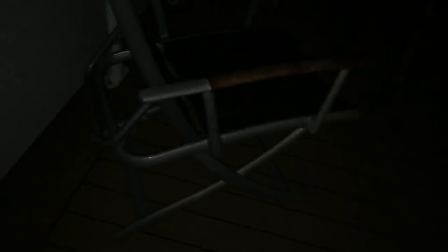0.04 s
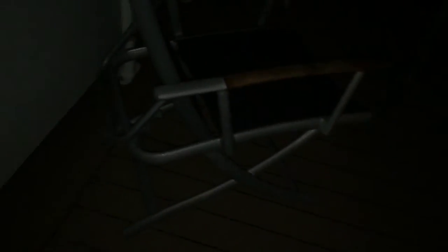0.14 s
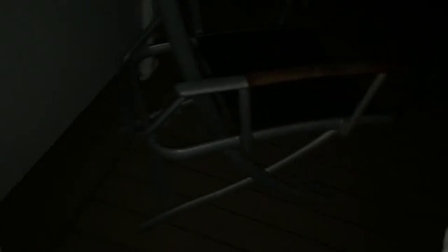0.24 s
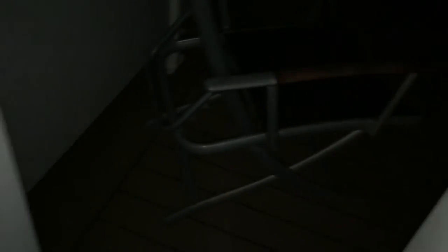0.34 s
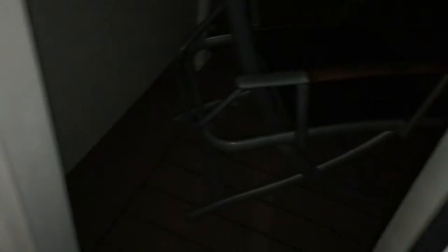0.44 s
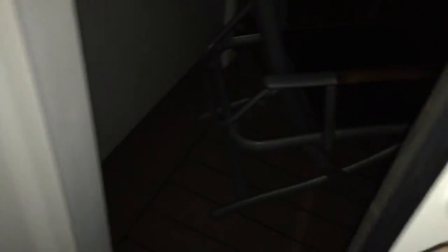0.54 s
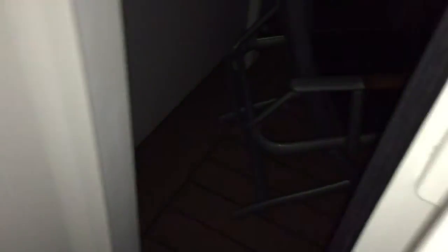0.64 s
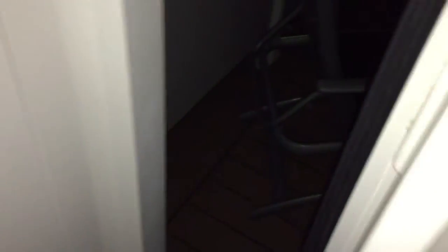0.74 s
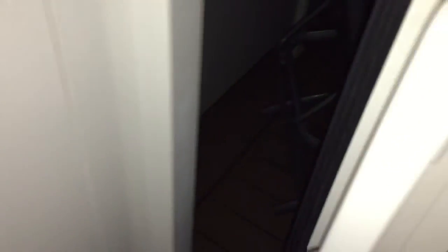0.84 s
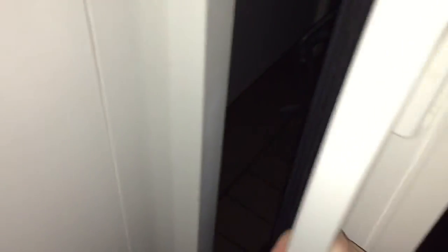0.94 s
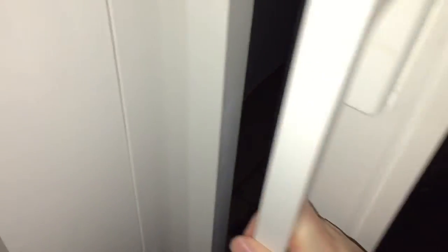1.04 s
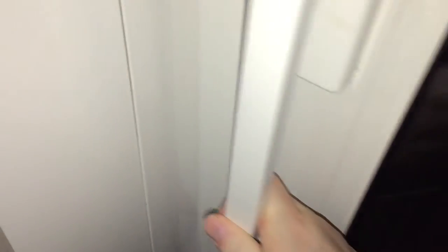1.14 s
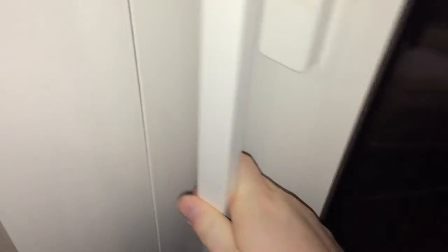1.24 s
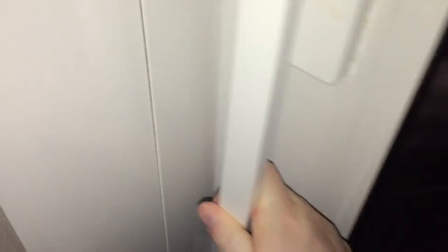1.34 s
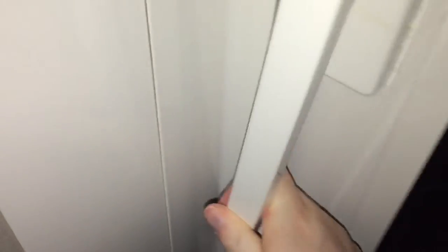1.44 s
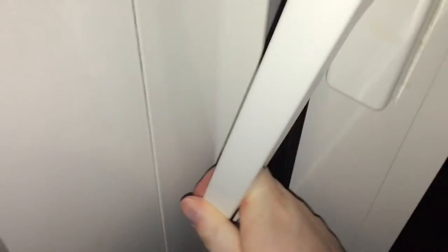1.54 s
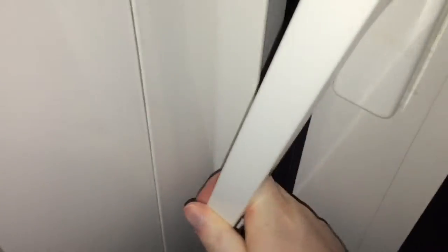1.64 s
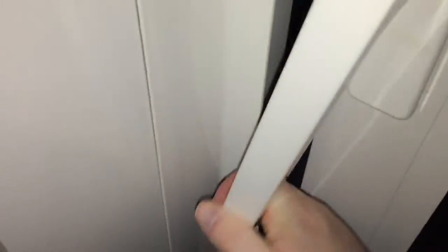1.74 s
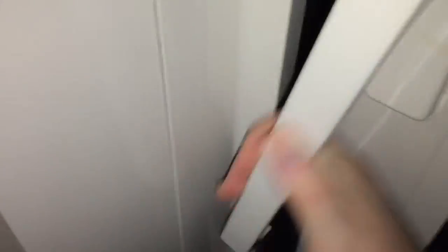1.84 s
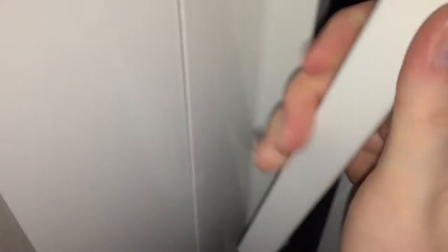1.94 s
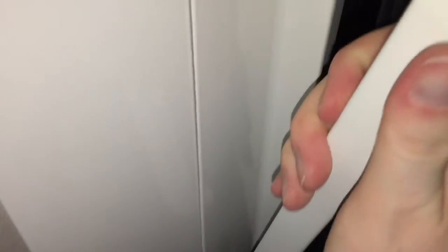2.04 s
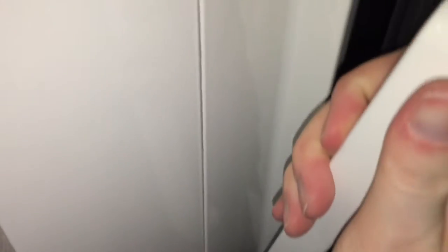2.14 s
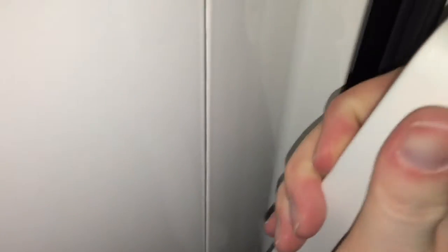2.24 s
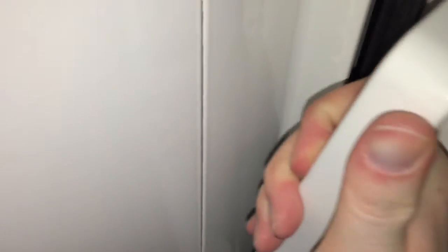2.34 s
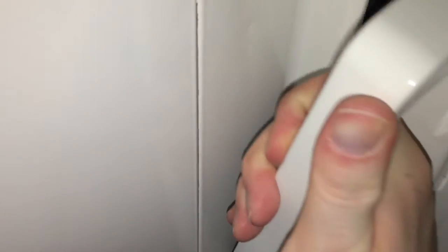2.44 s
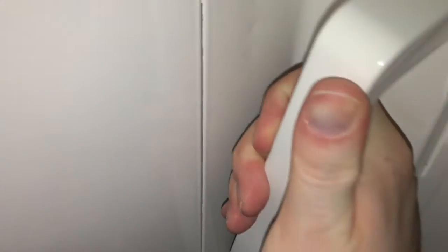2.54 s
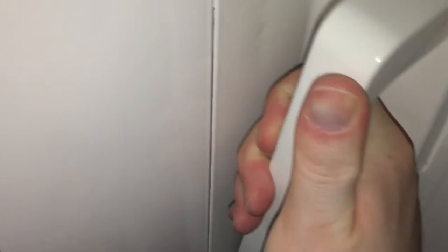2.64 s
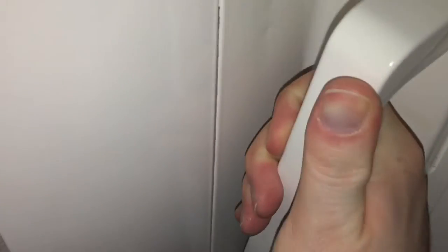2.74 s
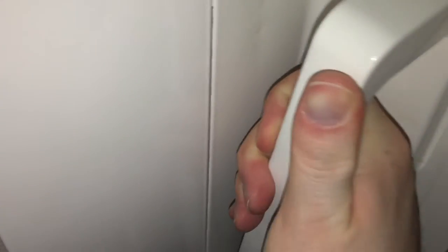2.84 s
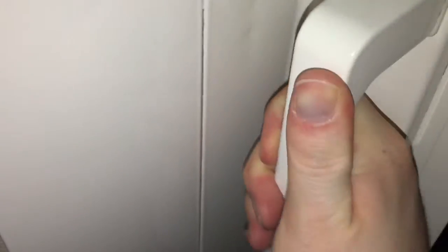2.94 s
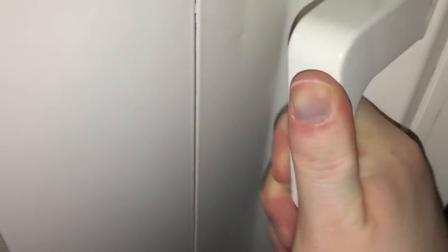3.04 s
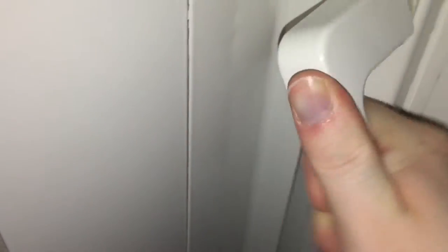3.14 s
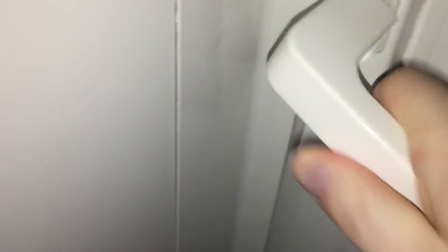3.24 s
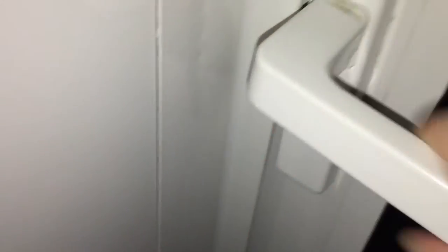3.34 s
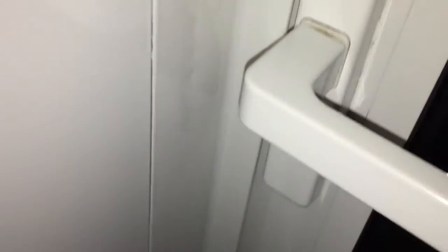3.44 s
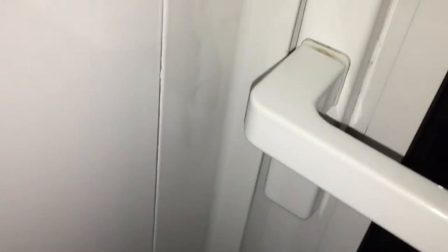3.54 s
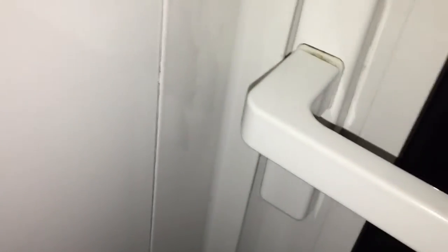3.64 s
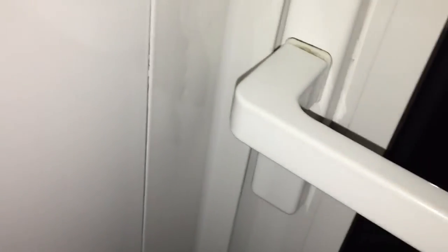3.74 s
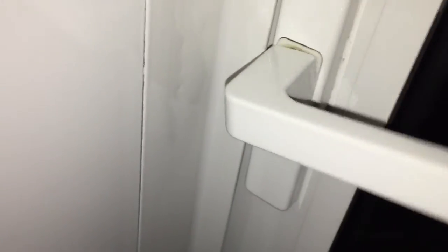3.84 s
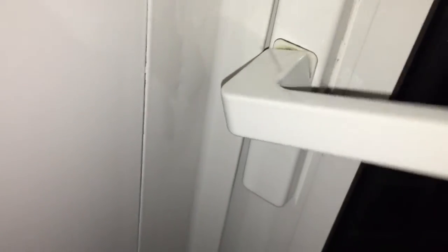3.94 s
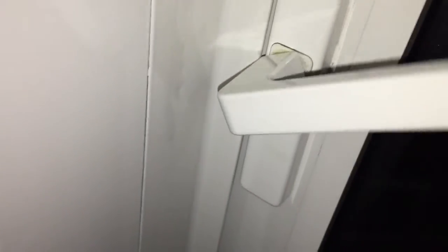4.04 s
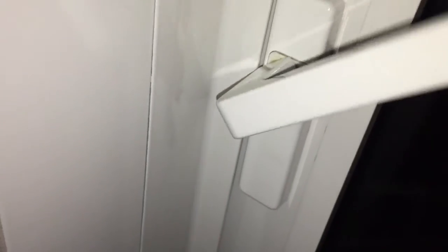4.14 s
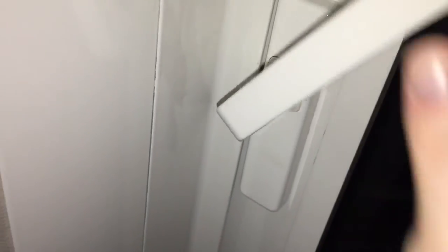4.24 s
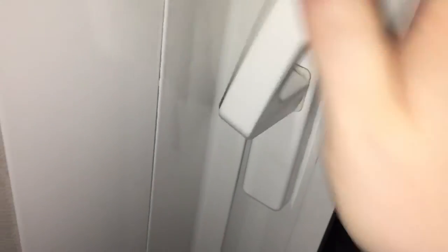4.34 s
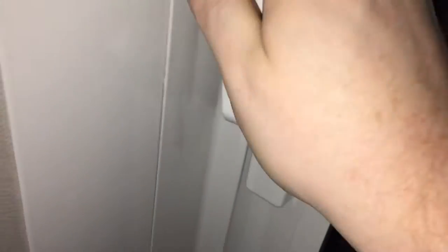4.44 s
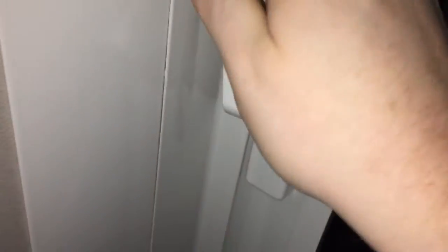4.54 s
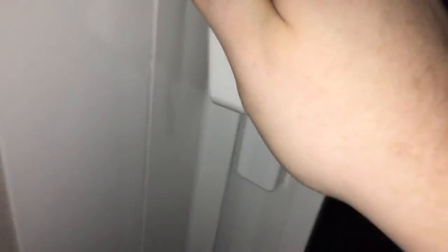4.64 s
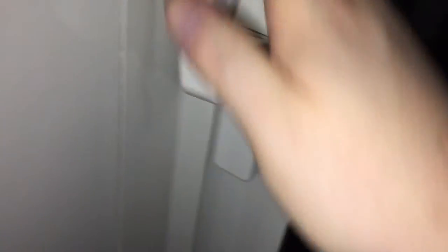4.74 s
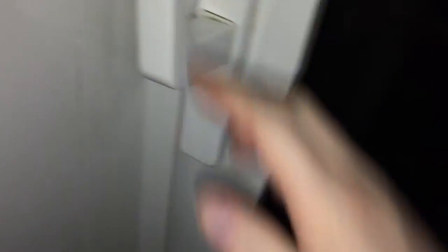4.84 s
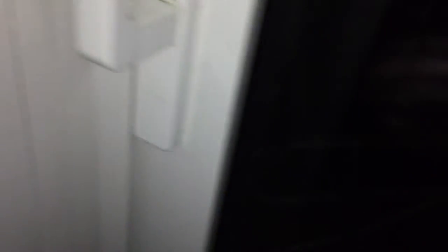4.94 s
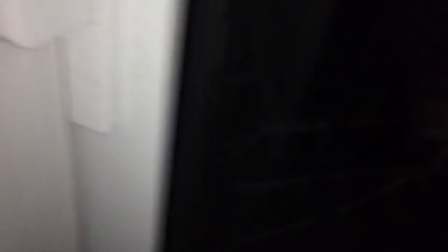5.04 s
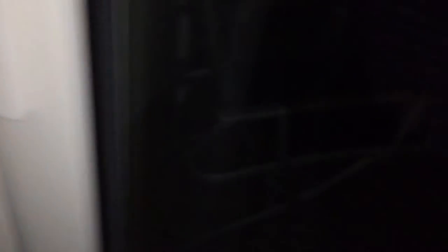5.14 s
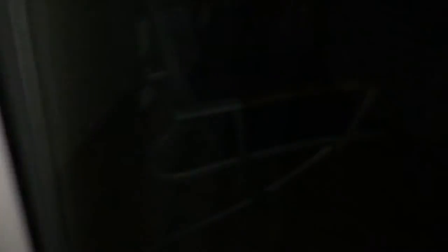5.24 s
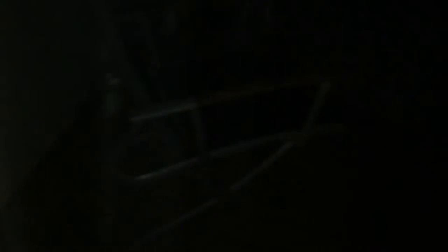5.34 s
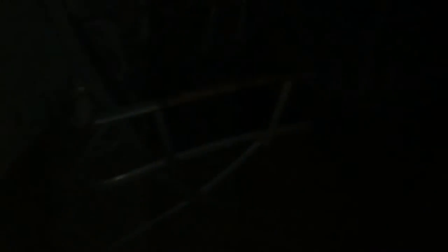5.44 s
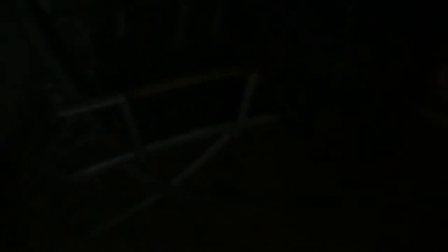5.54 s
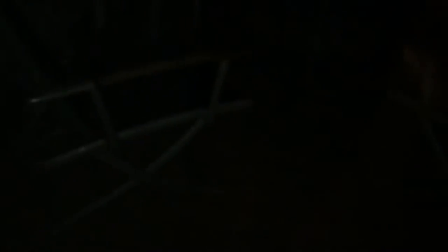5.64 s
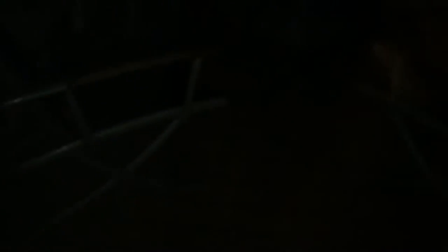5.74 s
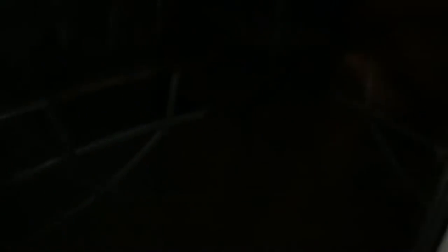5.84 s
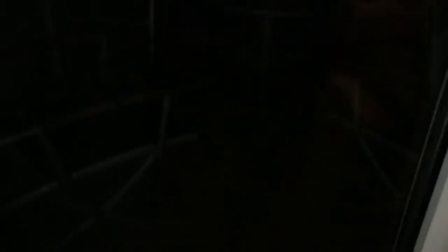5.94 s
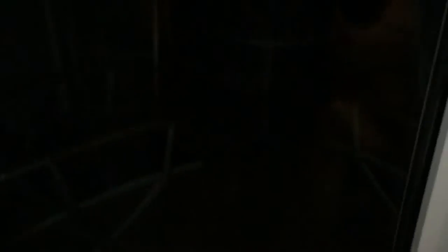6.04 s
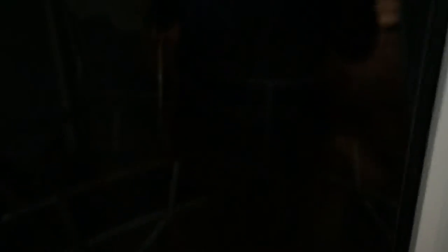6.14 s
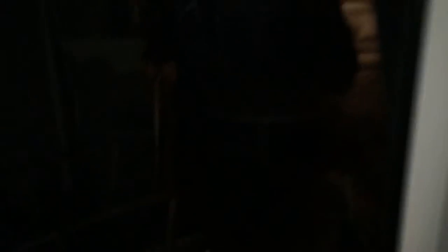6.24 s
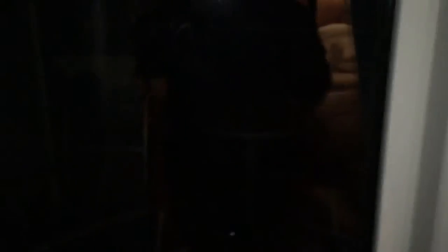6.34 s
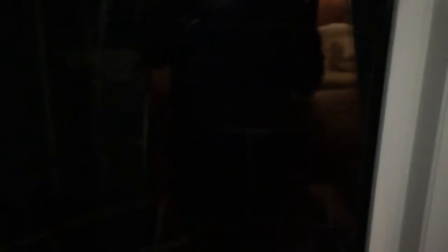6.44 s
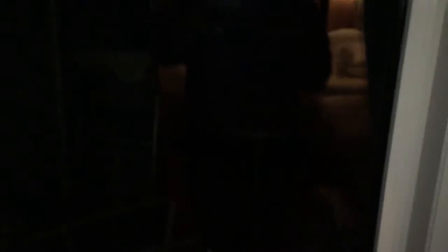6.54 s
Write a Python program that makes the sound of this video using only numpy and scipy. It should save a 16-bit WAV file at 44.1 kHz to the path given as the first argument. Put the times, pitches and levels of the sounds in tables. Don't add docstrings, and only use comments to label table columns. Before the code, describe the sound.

Close up in a small quiet cabin, a heavy door rolls along its rail with low rumble and drone, then bumps hard with a metallic rattle and buzzing frame. It creeps on, clicks and thumps dully into the frame. Fingers tick on a plastic handle, light catches click, and the bolt snaps home with a squeak, so loud it overloads the microphone. Faint taps follow.

```python
import sys
import numpy as np
from scipy import signal
from scipy.io import wavfile

SR = 44100
rng = np.random.default_rng(int(sys.argv[2]) if len(sys.argv) > 2 else 0)


def elevation(decibels):
    levels = np.asarray(decibels, float)
    return 10 ** (levels / 20)


def log_audio(samples):
    frames = np.atleast_2d(samples).T
    limited = np.clip(frames, -1, 1)
    pcm = np.round(limited * 32767).astype(np.int16)
    wavfile.write(sys.argv[1], SR, pcm)


N = 290178

# frequency in Hz, level in dB per Hz.
HUSH = [(18, -33), (30, -6), (60, 0), (120, -3), (171, -7), (253, -27), (500, -30), (765, -25), (1100, -22),
        (1730, -18), (2400, -25), (3300, -28), (5800, -31), (14600, -38)]
# frequency in Hz, time to fall 60 dB in seconds.
CABIN_ECHO = [(300, 0.29), (1500, 0.22), (5000, 0.17), (12000, 0.12)]

# time in seconds, swell in seconds, frequency in Hz, width in Hz, level in dB.
SLIDES = [
    (1.93, .07, 13000, 3500, -66),
    (2.35, .05, 5200, 700, -65),
    (2.3, .2, 2000, 800, -60),
    (5.91, .03, 12000, 7000, -65),
    (4.457, .006, 1900, 900, -42),
]
# time in seconds,
# swell in seconds, frequency in Hz, width in Hz, level in dB.
NUDGES = [(4.86, .13, 252, 14, -45), (.65, .11, 1003, 30, -47), (0.29, 0.08, 150, 13, -39),
          (1.29, 0.02, 1800, 600, -46), (1.309, .007, 2000, 2000, -42), (4.058, .02, 750, 650, -49),
          (3.94, .03, 1450, 500, -53), (2.21, 0.18, 235, 52, -50.5), (0.694, 0.036, 268, 18, -32),
          (.42, .13, 1520, 35, -51), (5.8, 0.0087, 1300, 300, -61), (4.84, 0.023, 1440, 390, -55),
          (6.24, 0.025, 280, 130, -43)]

# time in seconds, frequency in
# Hz, level in dB, swell in seconds, 60 dB fall in seconds.
SQUEAKS = [
    (4.4625, 1640, -3, .003, .026),
    (4.474, 1750, -11, .007, .015),
    (2.508, 2300, -36, .008, .03),
           (1.568, 2330, -43, .008, .04),
    (2.912, 1650, -44, .006, .04),
    (3.217, 1250, -35, .003, .025),
]
# time in
# seconds, frequency in Hz, level in dB, swell in seconds, 60 dB fall in seconds.
RINGS = [(1.323, 257, -3, 0.0031, 0.046), (1.327, 1208, -9, 0.0017, 0.054),
         (1.328, 2130, -7.5, 0.0047, 0.031), (1.346, 227, -4, 0.0057, 0.051),
         (1.357, 882, -12, 0.0052, 0.065), (1.384, 225, -13, 0.0064, 0.084),
         (1.385, 102, -13, 0.015, 0.28), (1.399, 1124, -12.5, 0.0029, 0.033),
         (2.5205, 1610, -6.5, 0.00082, 0.009), (2.528, 231, -13.5, 0.0083, 0.11),
         (2.59, 243.6, -30.5, 0.026, .12), (2.657, 1250, -18.5, 0.0029, 0.12),
         (2.659, 1800, -24.5, 0.0033, 0.074), (2.674, 420, -10.5, 0.002, 0.021),
         (2.69, 1138, -16.5, 0.0033, 0.06), (2.776, 1073, -19, 0.0022, 0.029),
         (2.777, 1996, -29.5, 0.0017, 0.052), (2.84, 103.9, -14, 0.016, 0.36),
         (3.022, 883, -34.5, 0.0034, 0.14), (3.024, 1386, -29, 0.0045, .05),
         (3.024, 2000, -37.5, 0.0028, .05), (3.03, 244, -17.5, 0.0096, 0.062),
         (3.843, 1370, -19, 0.00092, 0.016), (3.848, 1500, -20.5, 0.0024, 0.025),
         (3.884, 129, -28, 0.0065, .15), (4.07, 305, -34.5, 0.0083, 0.076),
         (4.4823, 905, -5.5, 0.0011, 0.031), (4.484, 616, -11, .001, 0.076),
         (4.485, 1672, -6.5, .004, 0.068), (4.483, 2960, -12.5, 0.0014, 0.058),
         (4.488, 2200, -12, .003, 0.079), (4.499, 236, -7.5, 0.0094, 0.13),
         (4.501, 338, -11.5, 0.0039, 0.12), (4.504, 167, -10.5, 0.0038, 0.13),
         (4.55, 246, -21.5, 0.017, 0.17),
         (6.166, 1850, -43, 0.0036, 0.057), (6.166, 4500, -46, .003, .06),
               (6.168, 5800, -49, .002, .03), (6.166, 2080, -47.5, .004, 0.043),
               (6.214, 320, -43, .008, .08), (6.224, 60, -37, 0.0048, .12), (6.228, 221, -41, .006, 0.075),
               (6.248, 303, -40.5, .006, 0.069), (6.254, 156, -39, 0.0048, 0.092),
               (6.273, 110, -39, .005, .09), (6.385, 450, -51, 0.0062, 0.039),
               (3.844, 2654, -29, 0.0012, 0.036), (3.846, 3235, -31, 0.0017, 0.038),
               (3.847, 1800, -28, 0.0025, 0.072), (3.846, 1230, -31.5, 0.0035, 0.083),
               (3.886, 240, -33, .005, 0.045), (3.94, 270, -38, 0.0087, 0.097),
               (3.385, 237, -35, 0.0099, 0.038), (1.775, 4500, -45.5, 0.0042, 0.033),
               (3.024, 4050, -33.5, .003, .03), (2.521, 490, -14.5, .001, .015),
               (3.82, 1600, -50, .004, .05), (2.712, 3800, -41, .003, .03), (2.959, 1100, -43.5, .002, .05),
               (4.465, 4030, -15, .002, 0.034), (4.512, 260, -10, 0.0034, 0.11),
               (4.503, 290, -9, .003, .06), (4.71, 250, -41, .015, .3), (4.879, 2300, -46, .003, .05),
               (4.05, 290, -36, .006, .07), (4.96, 150, -36, .01, .1), (5.0, 130, -34, .01, .1),
               (4.963, 1600, -42, .004, .05), (4.49, 1100, -10, .003, .05)]

# time in seconds, tap in dB, crack in dB, rattle's 60 dB fall in seconds, highest frequency in Hz.
TICKS = [(.869, -59.5, -50.5, 0.093, 16260), (1.772, -42.5, -50.5, 0.04, 6400),
         (2.798, -49, -54.5, 0.04, 5950), (3.136, -51, -60.5, 0.029, 14240),
         (3.219, -51, -64.5, 0.12, 16250), (4.878, -48.5, -54, 0.064, 5570), (4.886, -56, -60, 0.087, 4920),
         (4.933, -60, -58, 0.06, 14770), (4.957, -51, -53.5, 0.08, 11100), (4.965, -38.5, -50, 0.069, 6320),
         (4.979, -39, -46, 0.031, 17400), (4.984, -43, -51.5, 0.059, 9050), (5.037, -51, -54, 0.12, 7300),
         (5.048, -55, -56.5, 0.11, 5490), (5.997, -48.5, -58.5, 0.076, 9080),
         (6.013, -53.5, -62, 0.059, 12180), (6.168, -52.5, -54.5, 0.076, 17470)]
# time in seconds, body in dB, rattle's 60 dB fall in seconds.
THUDS = [(3.364, -46, 0.059), (3.818, -50, 0.091), (4.01, -48, .12), (4.033, -48, 0.052),
         (4.05, -41, 0.076), (4.717, -49, 0.049), (4.986, -49.5, 0.028), (6.216, -50.5, 0.031),
         (6.257, -65, 0.095)]
# time in seconds, knock peak in dB, body in dB,
# rattle's 60 dB fall in seconds, highest frequency in Hz.
CATCHES = [(2.521, -7.5, -18.5, 0.0068, 17670), (2.525, -10, -22.5, 0.014, 7270),
           (2.535, -23.5, -23.5, 0.026, 9050), (3.024, -32, -41.5, 0.043, 14560),
           (3.845, -27, -40.5, 0.044, 4800), (3.868, -43, -36.5, 0.068, 4400),
           (3.887, -55.5, -58, .042, 4508), (4.463, -19, -21, 0.12, 19120), (4.483, -5.5, -7, 0.05, 18290),
           (4.487, -9, -14, 0.024, 18750), (4.492, -6.5, -12.5, 0.026, 18100),
           (4.496, -9.5, -13.5, 0.069, 15980), (4.503, -20.5, -10, .04, 12030)]
# time in seconds, knock peak in dB, crack in dB, body in dB,
# rattle's 60 dB fall in seconds.
BLOWS = [(1.315, -19, -44, -21, .11), (1.323, -20, -34, -8, 0.015), (1.327, -9.5, -6, -16.5, 0.03),
         (1.335, -12, -22.5, -10.5, 0.023), (1.345, -18, -29.5, -24, 0.046),
         (1.355, -21.5, -44.5, -13, 0.025), (1.381, -29, -66, -13, 0.025), (1.401, -29, -49, -14.5, 0.032),
         (2.657, -27.5, -53, -25.5, 0.18), (2.675, -21.5, -51.5, -13, 0.09),
         (2.69, -20, -44.5, -19.5, 0.012), (2.715, -26, -54, -25, 0.023), (2.738, -47.5, -69, -11, 0.057),
         (2.777, -34, -67, -11, 0.016), (2.799, -39, -71, -11, 0.013), (2.818, -48, -71, -23.5, 0.023),
         (2.863, -52, -100.5, -26, 0.018), (2.889, -73, -73, -28, 0.057), (2.959, -42.5, -80, -30.5, 0.32)]

# frequency in Hz, width in Hz, level in dB.
GRIP = [(1075, 110, 6.5), (1610, 310, 9), (1970, 480, 8), (2200, 410, 3.5), (2860, 100, -33)]
# frequency in Hz, width in Hz, level in dB.
LOCK_CASE = [(60.4, 38, -7.5), (167, 34, -6), (230.6, 8.3, 3.5), (255, 5.1, 1.5), (325, 16, -2),
             (424, 11, -2), (481, 26, -6.5), (616, 120, -9), (867, 160, -11)]
# frequency in Hz, width in Hz, level in dB.
KNOCK = [(633, 65, -3), (896, 150, 4), (1130, 650, 1.5), (1500, 140, 6.5), (1750, 620, -1.5),
         (2220, 630, -5.5), (3130, 360, -40)]
# frequency in Hz, width in Hz, level in dB.
FRAME = [(851.3, 35, -0.5), (1000, 72, -7.5), (1125, 45, -1.5), (1250, 55, -0.5), (1336, 54, -3),
         (1552, 90, -6), (1800, 200, -17)]
# frequency in Hz, level in dB per Hz.
CRACK = [(1470, -26.5), (2500, -2.5), (2770, -1), (4690, -1), (8270, -8.5), (12200, -13), (14500, -9.5),
         (16000, -28)]

# frequency in Hz, width in Hz, level in dB.
SWAY = [(39.7, 13, -3.5), (57.4, 4.7, 11.5), (62, 24, 3)]
# frequency in Hz, width in Hz, level in dB.
PANEL = [(98.5, 26, 0), (135.7, 16, 8), (153.7, 42, 1), (245, 20, 0.5), (295.5, 44, -7.5)]
# frequency in Hz, width in Hz, level in dB.
RAIL = [(420, 120, -2), (560, 290, -6.5), (910, 84, -4), (1026, 40, 1), (1266, 330, -5)]
# frequency in Hz, width in Hz, level in dB.
RAIL_WHINE = [(1515, 52, 2.5), (1580, 360, -3), (1800, 140, -1), (2000, 170, -8.5), (2240, 210, -4.5),
              (2420, 250, -16)]
# frequency in Hz, level in dB per Hz.
GRIT = [(1470, -34.5), (2500, 0), (4840, -13.5), (6500, -16.5), (11500, -28.5), (15300, -25.5),
        (16000, -45)]
# time of the peak in seconds,
# sway in dB, panel rumble in dB, rub in dB, 60 dB fall in seconds.
LURCHES = [(1.0, -48, -30.5, -60.5, 0.74), (1.27, -46.5, -33, -64, 0.48), (1.429, -28.5, -26, -45, 0.78),
           (1.78, -44, -41, -60, 1.43), (2.4, -56.5, -47, -60.5, 1), (2.57, -55.5, -36, -48, 0.64),
           (2.741, -22, -15.5, -44, 0.5), (3.059, -43.5, -37.5, -76, 1.2), (3.62, -49, -62, -75, .6),
           (5.3, -51, -60, -75, 1.0), (5.72, -53, -66, -75, .6), (6.42, -53, -62, -75, .4),
           (3.881, -46, -39, -68.5, 0.68), (4.048, -55.5, -47.5, -65.5, 0.65),
           (4.619, -63, -40, -64.5, 0.99), (4.997, -53.5, -43, -58, .8), (3.39, -43.5, -39.5, -68, 0.23),
           (5.998, -61, -57, -57, 0.18), (6.225, -43.5, -49, -80, 0.28)]
# time in seconds, level in dB.
ROLL = [
    (0.0, -40.5),
    (0.036, -46.5),
    (0.132, -42.5),
    (.25, -40.5),
    (0.578, -42.5),
    (0.784, -44),
    (.95, -45),
    (1.184, -47),
    (1.3, -43.5),
]


def rms_one(x):
    return x / np.sqrt(np.mean(x ** 2) + 1e-20)


def below(hz, x, order=4):
    return signal.sosfilt(signal.butter(order, min(hz, 19000), fs=SR, output="sos"), x)


def at_hz(points, hz):
    table_hz, values = np.transpose(points)
    return np.interp(np.log(hz), np.log(table_hz), values)


def drift(rate):
    r = np.exp(-80 * np.pi * rate / SR)
    chance = rng.standard_normal(N // 40 + 2002)
    slow = signal.lfilter([1], [1, -2 * r, r * r], chance)[2000:]
    return np.interp(np.arange(N) / 40, np.arange(len(slow)), rms_one(slow))


def grains(spread_db):
    size_db = spread_db * np.minimum(rng.exponential(1, N), 4)
    return rms_one(rng.standard_normal(N) * elevation(size_db))


def resonate(x, peaks, wander_db=None):
    click, out, unit = np.arange(SR // 2) == 0, 0, 0
    for k, (hz, width, level_db) in enumerate(peaks):
        r = np.exp(-np.pi * max(width, 5) / SR)
        zeros = [(1 - r * r) / 2, 0, (r * r - 1) / 2]
        poles = [1, -2 * r * np.cos(2 * np.pi * hz / SR), r * r]
        gain = (-1) ** k * elevation(level_db)
        swell = elevation(wander_db * drift(4.1)) if wander_db else 1
        out = out + gain * swell * signal.lfilter(zeros, poles, x + 1e-18)
        unit = unit + gain * signal.lfilter(zeros, poles, click + 1e-18)
    return out / np.sqrt(np.sum(unit ** 2))


def colour(x, spectrum, patchy_db=0.0, slow_db=0.0):
    lowest, highest = spectrum[0][0], spectrum[-1][0]
    count = int(2 * np.log2(highest / lowest)) + 2
    edges = np.geomspace(lowest, min(highest, 19000), count)
    click, out, unit = np.arange(SR // 2) == 0, 0, 0
    for k, (low, high) in enumerate(zip(edges, edges[1:])):
        band = signal.butter(2, [low, high], "band", fs=SR, output="sos")
        gain = (-1) ** k * elevation(at_hz(spectrum, np.sqrt(low * high)))
        flicker = elevation(patchy_db * drift(15) + slow_db * drift(1.5)) if patchy_db else 1
        out = out + gain * flicker * signal.sosfilt(band, x + 1e-18)
        unit = unit + gain * signal.sosfilt(band, click + 1e-18)
    return out / np.sqrt(np.sum(unit ** 2))


def quiet_cabin():
    level = elevation(-56 + 1.5 * drift(2))
    return level * colour(rng.standard_normal(N), HUSH + [(16000, -44)], patchy_db=1.5, slow_db=1.4)


def cabin_echo(x):
    age, echo = np.arange(SR // 2) / SR, 0
    for hz in 250 * 2. ** np.arange(7):
        octave = signal.butter(1, [hz / 1.4, min(hz * 1.4, 20000)], "band", fs=SR, output="sos")
        noise = signal.sosfilt(octave, rng.standard_normal(len(age)))
        near = elevation(-60 * age / np.clip(at_hz(CABIN_ECHO, hz), .03, .6))
        next_room = elevation(-30 - 60 * age / .55) * (hz < 5000)
        echo = echo + noise * (near + next_room)
    echo = echo * np.clip(age / 0.013, 0, 1)
    return signal.fftconvolve(x, echo / np.sqrt(np.sum(echo ** 2)))[:N]


def slides():
    t, skin, out = np.arange(N) / SR, grains(1.4), 0
    for s, swell, hz, width, level_db in SLIDES + NUDGES:
        rub = elevation(level_db) * np.exp(-.5 * ((t - s) / swell) ** 2) * skin
        out = out + below(hz + 2 * width, resonate(rub, [(hz, width, 0)]), order=3)
    return out


def squeaks():
    out, age = np.zeros(N + SR), np.arange(SR // 3) / SR
    for s, hz, level_db, swell, t60 in SQUEAKS + RINGS:
        step = age * hz / 8
        after_swell = np.clip(age / swell - 1, 0, 1)
        waver, slip = [np.interp(step, np.arange(300), chance - chance[0]) * after_swell
                       for chance in rng.standard_normal((2, 300))]
        fall_db = 60 * np.maximum(age - swell, 0) / t60
        shape = np.clip(age / swell, 0, 1) ** 2 * elevation(level_db + 2 * waver - fall_db)
        out[round(s * SR):][:len(age)] += shape * np.sin(2 * np.pi * hz * age + .5 * slip)
    return out[:N]


def rattles(events):
    drive, age = np.zeros((3, N + SR)), np.arange(SR // 4) / SR
    for s, knock_db, crack_db, body_db, t60, top_hz in events:
        noise, bounce = rng.standard_normal((2, len(age)))
        rise = 1 - np.exp(-(age + 1 / SR) * top_hz / 0.5)
        uneven_db = 5.6 * rms_one(below(300, bounce, order=1))
        rattle = noise * rise * elevation(uneven_db - 60 * age / np.clip(t60, .004, .25))
        shove = 5.3 * np.sign(noise[0]) * (age == 0)
        push = below(top_hz / 4.2, 0.27 * rattle + shove, order=2)
        crack = below(top_hz, rattle, order=6)
        gains = elevation(np.array([[knock_db - 0.5], [crack_db + 7.0], [body_db + 9.0]]))
        drive[:, round(s * SR):][:, :len(age)] += gains * [rattle, crack, push]
    return drive[:, :N]


def finger_ticks():
    return rattles([(s, tap, crack, tap - 9, t60, hz) for s, tap, crack, t60, hz in TICKS])


def lock_clicks():
    events = []
    for s, knock, body, t60, top_hz in CATCHES:
        crack = knock - 5.5 + 4 * np.log2(top_hz / 16900)
        events.append((s, knock, crack, body, t60, top_hz))
    for s, body, t60 in THUDS:
        events.append((s, body - 12.5, body - 26.5, body, t60, 2800))
    return rattles(events)


def door_blows():
    events = []
    for s, knock, crack, body, t60 in BLOWS:
        octaves = min((crack - knock + 7.5) / 17, 0)
        events.append((s, knock, crack, body, t60, 16900 * 2 ** octaves))
    return rattles(events)


def frame_shiver(knocks):
    r = elevation(-120 / (.78 * SR))
    energy = signal.lfilter([1 - r], [1, -r], knocks ** 2)
    return elevation(-3.5) * resonate(np.sqrt(energy) * grains(3.1), FRAME, wander_db=1.5)


def contacts():
    door_knock, door_crack, door_body = door_blows()
    lock_knock, lock_crack, lock_body = lock_clicks()
    finger_tap, finger_crack, finger_body = finger_ticks()
    knock = below(4900, resonate(door_knock + lock_knock, KNOCK) + resonate(finger_tap, GRIP))
    crack = colour(door_crack + lock_crack + finger_crack, CRACK)
    panel = below(700, resonate(door_body, PANEL) + elevation(-11.5) * resonate(door_body, SWAY))
    frame = below(2100, frame_shiver(door_knock + elevation(-30) * lock_knock))
    case = below(1300, resonate(lock_body + finger_body, LOCK_CASE))
    return knock + crack, panel + frame + case


def lurching():
    t, power = np.arange(0, N + 40, 40) / SR, 0
    sway_lag = np.array([[.07], [0], [0], [0]])
    for s, sway_db, rumble_db, rub_db, t60 in LURCHES:
        age = t - s - sway_lag
        fall_db = np.where(age < 0, 20 * (age / .09) ** 2, 60 * age / max(t60, .1))
        peak_db = np.array([[sway_db], [rumble_db], [rub_db], [rub_db - 16]])
        power = power + elevation(peak_db - np.minimum(fall_db, 200)) ** 2
    return [np.interp(np.arange(N) / SR, t, np.sqrt(p)) for p in power]


def rolling_speed():
    s, level_db = np.transpose(ROLL)
    times = np.r_[s[0] - .08, s, s[-1] + .08]
    return elevation(np.interp(np.arange(N) / SR, times, np.r_[-100, level_db, -100]))


def rolling():
    speed = rolling_speed()
    roll = speed * elevation(np.array([[-5.5], [8], [0], [-14.5]]))
    rest = elevation(np.array([[-55], [-68], [-100], [-100]]) + 2.5 * drift(3.6))
    sway, rumble, drone, grit = np.sqrt(roll ** 2 + rest ** 2 + np.square(lurching()))
    swaying = resonate(sway * grains(0.94), SWAY)
    rumbling = resonate(rumble * elevation(2.0 * drift(17.0)) * grains(0.24), PANEL)
    rough = elevation(.8 * drift(60))
    droning = resonate(drone * rough * grains(3.9), RAIL, wander_db=2.5)
    whine = elevation(-3.5) * speed * (speed / speed.max()) ** 0.5
    whine = whine + drone - np.minimum(speed, drone)
    whining = resonate(whine * rough * grains(1.8), RAIL_WHINE, wander_db=2.5)
    rail = below(2200, droning, order=2) + below(4400, whining)
    hiss = colour(grit * grains(2.5), GRIT, patchy_db=1.0)
    return below(380, swaying + rumbling) + rail + hiss


def scene():
    struck, ringing = contacts()
    sharp = struck + squeaks()
    moving = rolling() + slides()
    return (sharp + elevation(-20.5) * cabin_echo(sharp) + ringing + moving + quiet_cabin())[None]


def low_pass(x):
    return signal.sosfilt(signal.butter(12, 16380, fs=SR, output="sos"), x)


def record(dry):
    dry = signal.sosfilt(signal.butter(2, 34, "high", fs=SR, output="sos"), dry)
    climb = 13 * np.arange(N) / SR
    duck_db = 5 * (np.abs(dry[0]) > .25)
    held_db = np.maximum(np.maximum.accumulate(duck_db + climb) - climb, 0)
    gain = elevation(-signal.lfilter([.0005], [1, -.9995], held_db))
    overloaded = np.clip(gain * dry, -1.05, 1.05)
    mix = np.clip(below(19000, overloaded, order=20), -1, 1)
    return low_pass(mix)


dry = scene()
out = record(dry)
log_audio(out)
```